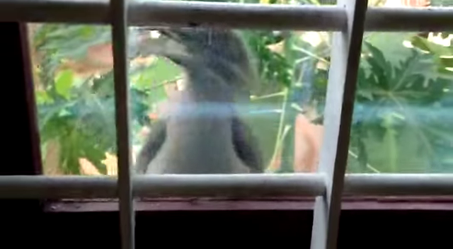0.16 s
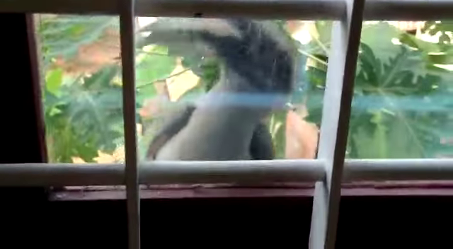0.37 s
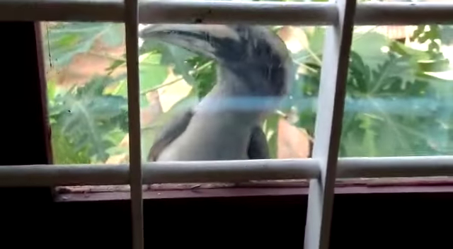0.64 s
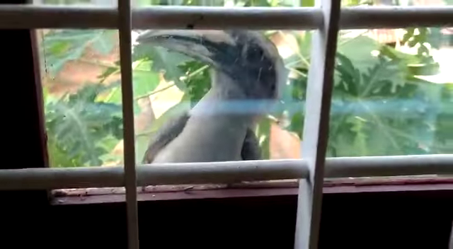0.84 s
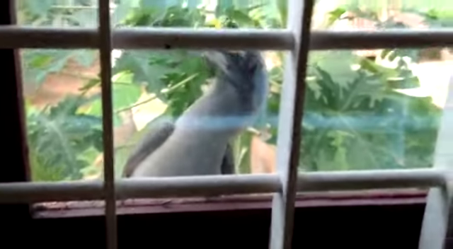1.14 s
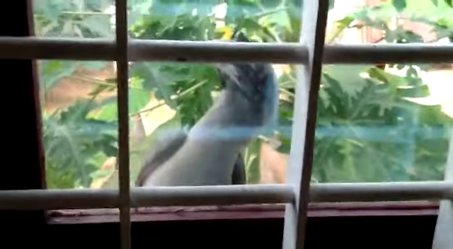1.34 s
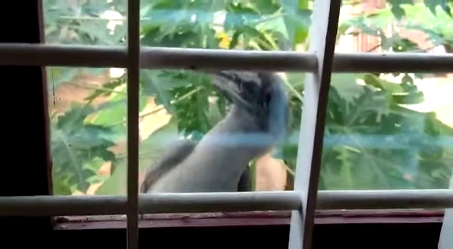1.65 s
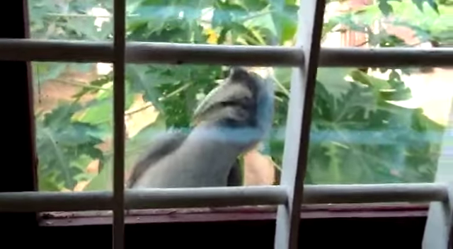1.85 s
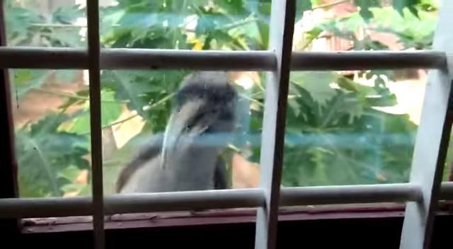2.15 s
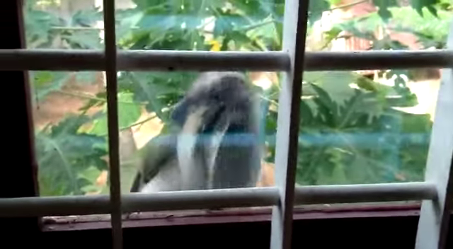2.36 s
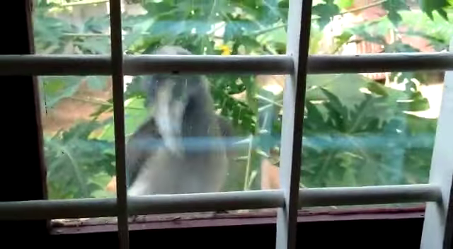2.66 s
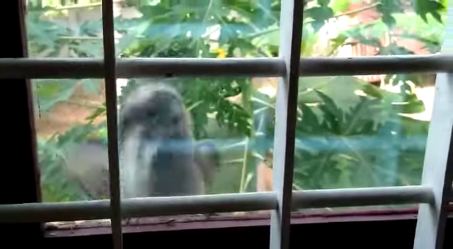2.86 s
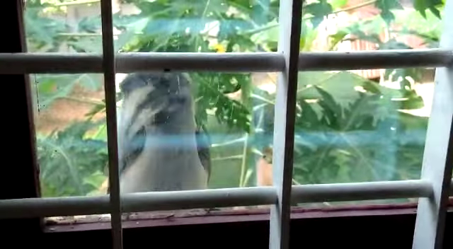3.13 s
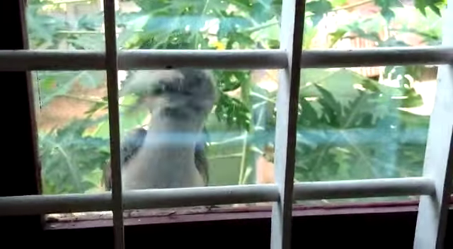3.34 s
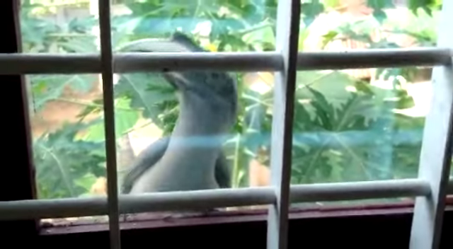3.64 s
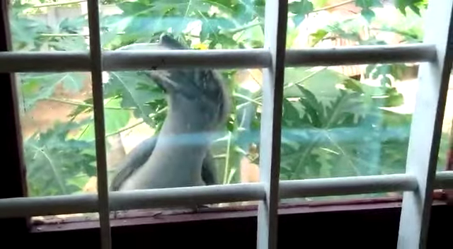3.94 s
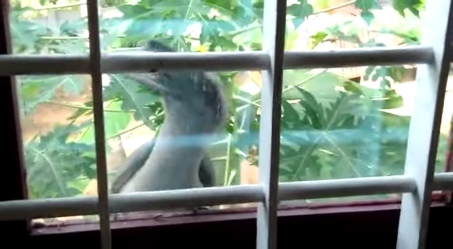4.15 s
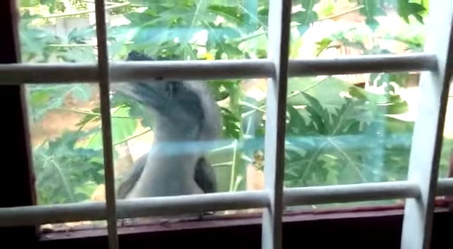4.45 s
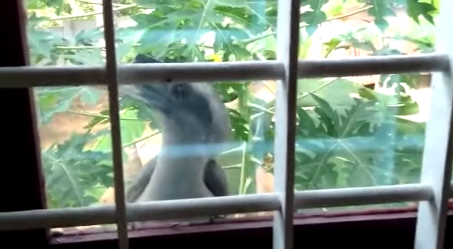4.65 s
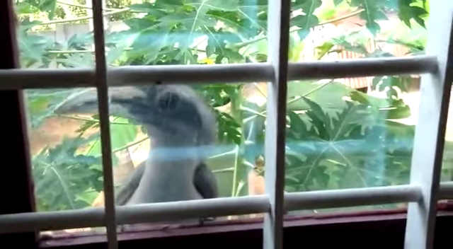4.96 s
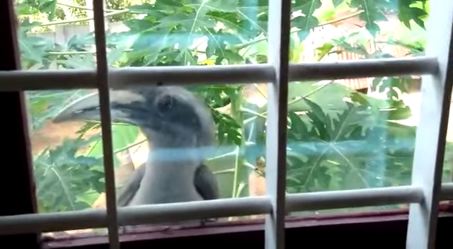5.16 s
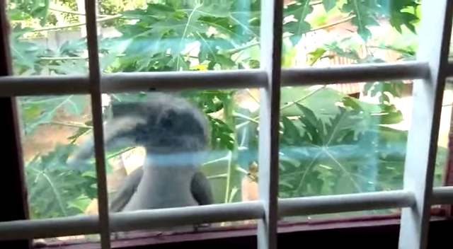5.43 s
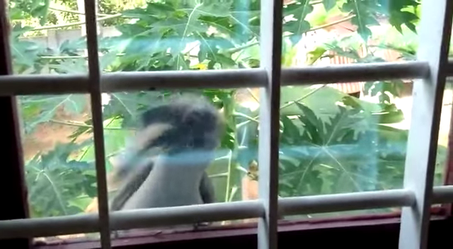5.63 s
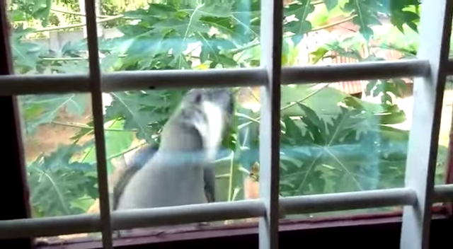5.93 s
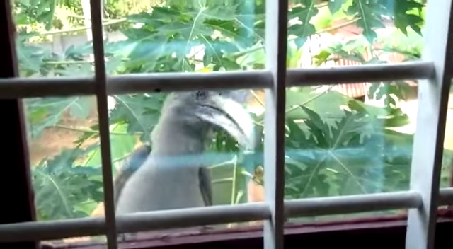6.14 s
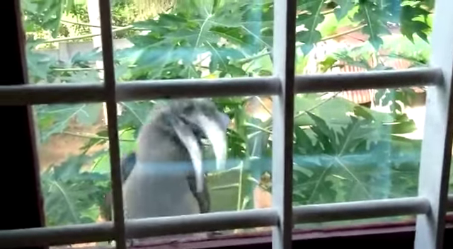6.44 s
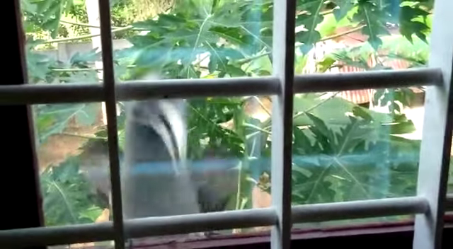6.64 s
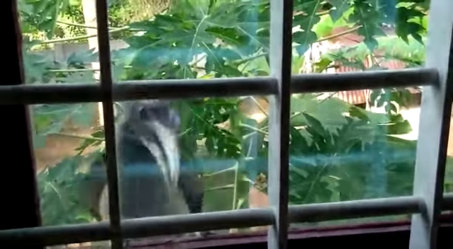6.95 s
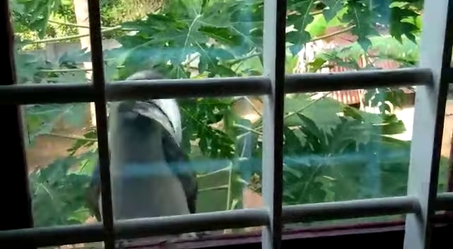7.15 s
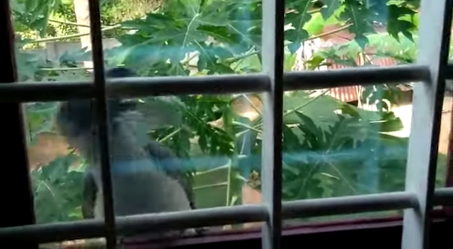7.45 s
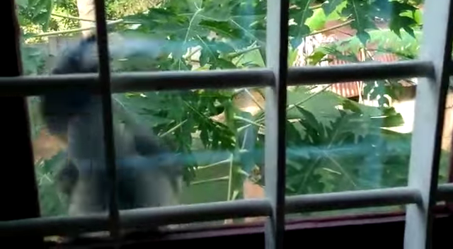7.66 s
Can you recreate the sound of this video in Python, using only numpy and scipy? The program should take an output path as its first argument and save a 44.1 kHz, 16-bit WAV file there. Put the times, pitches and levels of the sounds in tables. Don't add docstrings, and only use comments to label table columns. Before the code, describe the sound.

Irregular thumping, cracking raps of a big bill on framed glass, each with a low ringing and roomy reverberation. A first group fades into quiet town hum and thin cicada rasp; a second group follows, with a rattle and a brief metallic bar strike. Weak taps end it, then a small bird whistles once outside. Close indoor phone pickup.

```python
import sys
import numpy as np
from scipy import signal
from scipy.fft import rfft, irfft
from scipy.io import wavfile
from scipy.ndimage import uniform_filter1d

SR = 44100
rng = np.random.default_rng(int(sys.argv[2]) if len(sys.argv) > 2 else 0)


def master_out(mix):
    frames = np.transpose(np.atleast_2d(mix))
    ceiling = np.clip(frames, -1, 1)
    pcm = np.round(ceiling * 32767).astype(np.int16)
    wavfile.write(sys.argv[1], SR, pcm)


def decibels_to_gain(level_db):
    exponent = np.asarray(level_db, float) / 20
    return 10 ** exponent


N = 343520
TIME = np.arange(N) / SR
KNOCK_LEAD = 1024


# start in seconds,
# strength in dB, then bass, treble and straight thump in dB relative to the strength.
BLOWS = [(0.124, -35, -9, -31, 8), (0.196, -18, -11.5, -21, 10), (0.393, -12, -10.5, -12, 12.5),
         (0.696, -12, -15.5, -15, 12), (1.09, -23, -16, -25, 11), (3.443, -29.5, -12, -24, 11),
         (3.535, -35, -8, -28, 5), (4.403, -11, -12.5, -18, 10), (4.699, -12.5, -10.5, -11, 9),
         (5.095, -13.5, -10, -19, 5.5), (5.864, -44.5, 1, -20, 4), (6.045, -37, -10.5, -33, 5),
         (6.261, -29.5, -3, -30.5, 4.5)]


def blows():
    out = np.zeros((2, N))
    for s, db, bass_db, treble_db, thump_db in BLOWS:
        add(out, thump(db) * decibels_to_gain(db + bass_db + thump_db + 12.7), s + 0.00098)
        add(out, crack(db + treble_db - 5.5, 0.014), s + 0.0014)
    return out


# frequency in Hz, level in dB, T60 in seconds.
THUMP = [(246, -1.5, 0.017), (700, -23, 0.012), (1390, -34, 0.014)]


def thump(db):
    push_s = 0.00062 * decibels_to_gain(-.25 * (db + 13.5))
    push = np.hanning(int(push_s * SR) + 2)
    displaced = np.convolve(ring(THUMP, .06), push / push.sum())
    bend = np.diff(displaced) * SR / (2 * np.pi * THUMP[0][0])
    return ports(np.r_[np.zeros(8), bend], 5, .6)


def crack(db, fade_s):
    t = TIME[:4096]
    return decibels_to_gain(db) * band(rng.standard_normal((2, len(t))), 1500, 10400) * np.exp(-t / fade_s)


# frequency in Hz, level in dB, T60 in seconds.
PANE = [(80.5, -6, 0.96), (111.5, -18, 1.1), (143.2, 1.5, 1.59), (185, -3.5, 2.65), (209.7, -1.5, 1.02),
        (234, -17, 0.6), (277, -6.5, 1.4), (363, -15, 1.1), (417, -13, .9), (461, -11.5, 0.86),
        (639, -11, 0.64)]


def pane_ringing():
    out = np.zeros((2, N))
    modes = np.array([ring([mode], 2.5) for mode in PANE])
    modes = modes * (1 - np.exp(-TIME[:modes.shape[1]] / 0.0022))
    for s, db, *_ in BLOWS:
        chance = rng.standard_normal((2, len(PANE)))
        pane = (decibels_to_gain(2.0 * chance[0]) * np.sign(chance[1])) @ modes
        ring_db = db - 11
        add(out, stilled(pane, s) * decibels_to_gain(ring_db), s)
    return out


# start in seconds, frequency in Hz, level in dB, T60 in seconds.
FAVOURED = [(.124, 575, -38, 0.16), (.124, 640, -39, 0.21), (.197, 618, -32.5, 0.44),
            (.408, 1332, -17.5, 0.06), (.4, 605, -29, .5), (.698, 915, -21, 0.15), (.71, 1370, -21.5, .08),
            (.7, 185, -28, 4.1), (3.444, 3670, -44, 0.023), (3.444, 580, -38, 0.19),
            (3.446, 800, -44, 0.13), (4.356, 1700, -33, 0.006), (5.864, 186, -45, .8),
            (5.1, 184.5, -27.5, 3.6), (5.45, 191.2, -41.5, 4.), (6.046, 864, -48, .08),
            (6.262, 234, -36, 0.9), (6.262, 320, -31, 0.067), (6.262, 700, -39, 0.22)]


def favoured_modes():
    out = np.zeros((2, N))
    onset = 1 - np.exp(-TIME[:int(2.5 * SR)] / .002)
    for s, *mode in FAVOURED:
        add(out, stilled(ring([mode], 2.5) * onset, s), s)
    return out


QUENCHES = [.393, .697, 4.699, 5.095, 6.261, 99]


def stilled(sound, s):
    left = min(q for q in QUENCHES if q > s + .05) - s
    return sound * np.exp(-np.maximum(TIME[:len(sound)] - left, 0) / .02)


# start in seconds, level in dB, fade in seconds.
FURTHER_GRAZES = [
    (1.092, -40, .008),
    (3.445, -50, .008),
    (4.708, -21, 0.011),
    (6.046, -49, 0.0046),
]


def further_grazes():
    out = np.zeros((2, N))
    for s, db, fade_s in FURTHER_GRAZES:
        add(out, crack(db, fade_s), s)
    return out


# start in seconds, strength in dB, dull part in dB.
GRAZES = [
    (4.3549, -59, -6),
    (5.2911, -47.5, -1),
    (5.412, -51, 12),
    (5.475, -49, 10),
    (5.5006, -36.5, -3),
    (5.5287, -23, -13.5),
    (5.5702, -28, -17),
    (6.2639, -43.5, 2),
]


def grazes():
    out = np.zeros((2, N))
    for s, db, _ in GRAZES:
        add(out, crack(db + 0.5, 0.0078), s + 0.00073)
    return out


# frequency in Hz, level in dB, T60 in seconds.
BAR = [(818, -19, .9), (838, -21, .8), (866, 1.5, 0.062), (985, -21, 0.22), (3800, -10, 0.2),
       (3950, -15, .5), (6500, -18, .3)]


def metal_bar():
    out = np.zeros((2, N))
    bar = np.r_[np.zeros(8), ring(BAR, 0.92)]
    add(out, ports(bar, 4, -1.1) * decibels_to_gain(-25.5), 5.528)
    return out


def shaken_room():
    shake = np.zeros((1, N))
    for s, db, bass_db, treble_db, _ in BLOWS:
        deep_db = bass_db + 6 + .4 * (db + 15)
        colour = [(80, deep_db), (200, bass_db + 7), (800, -1), (3000, treble_db + 15.5)]
        add(shake, decibels_to_gain(db) * knock(colour), s)
    for s, db, dull_db in GRAZES:
        colour = [(300, dull_db - 10), (1200, dull_db), (4000, -7.5), (12000, 6)]
        add(shake, decibels_to_gain(db + 11) * knock(colour), s)
    return decibels_to_gain(13) * signal.fftconvolve(shake, room(), axes=1)[:, KNOCK_LEAD:N + KNOCK_LEAD]


def knock(colour):
    hz = np.maximum(np.arange(KNOCK_LEAD + 1) * SR / (2 * KNOCK_LEAD), 1)
    return np.roll(irfft(decibels_to_gain(at(colour, hz))), KNOCK_LEAD)


# frequency in Hz, density in dB per Hz.
SHAKE = [(40, -26), (70, -12), (110, 1), (170, -5.5), (260, -8.5), (400, -18), (650, -17.5), (1000, -20.5),
         (1600, -22.5), (2500, -25), (4000, -29), (6500, -37), (10500, -49.5), (15000, -55.5)]
# frequency in Hz, T60 in seconds.
ROOM_T60 = [(60, 0.79), (160, 1.13), (420, 1.31), (1100, 0.72), (2910, 0.77), (7680, 0.56)]


def room():
    t = TIME[:int(1.6 * SR)]
    build = np.clip((t - .002) / 0.01, 0, 1) ** 2
    early = 1 + 2.52 * np.exp(-t / 0.01)

    def decay(hz):
        return build * early * decibels_to_gain(-60 * t / at(ROOM_T60, hz))
    return diffuse(SHAKE, len(t), decay, 0.97)


def chirp():
    start_s, length_s = 6.771, .094
    age = np.clip(TIME - start_s, 0, length_s)
    hz = 3335 - 2700 * age - 150 * (age / length_s) ** 4
    phase = 2 * np.pi * np.cumsum(hz) / SR
    on = np.clip(age / .014, 0, 1) * np.clip((length_s - age) / .012, 0, 1)
    cracked = np.exp(-((TIME - 6.818) / .013) ** 2)
    voice = (1 - .65 * cracked) * np.sin(phase) + decibels_to_gain(-19) * cracked * np.sin(2 * phase)
    call = on * decibels_to_gain(-29.5 - 100 * age) * voice
    t = TIME[:SR]
    yard = rng.standard_normal((2, SR)) * decibels_to_gain(-60 * t / 0.51) * (t > .025)
    return ports(call, 6, 0.1) + decibels_to_gain(-37.5) * signal.fftconvolve(call[None], yard, axes=1)[:, :N]


def cicada():
    phase = np.cumsum(238 * (1 + 0.03 * walk(60))) / SR
    clicks = np.diff(np.floor(phase), prepend=0)
    clicks = clicks * decibels_to_gain(3 * rng.standard_normal(N)) * np.sign(rng.standard_normal(N))
    t = TIME[:256]
    belly = np.sin(2 * np.pi * 9000 * t) * np.exp(-((t - .0025) / .0009) ** 2)
    rasp = band(rng.standard_normal(N), 8800, 10000)
    song = unit(np.convolve(clicks, belly)[:N]) + 0.96 * unit(rasp)
    return ports(song * phrasing() * decibels_to_gain(-7.5), -1, -3.0)


# start in seconds, length in seconds, level in dB.
PHRASES = [(.09, .24, -61), (1.34, .33, -64), (1.77, .15, -67), (1.97, .05, -64), (2.08, .16, -62),
           (2.17, .07, -59), (2.25, .17, -64), (2.47, .15, -61.5), (2.64, .12, -63), (2.72, .18, -62),
           (2.94, .19, -64), (3.15, .21, -61), (3.42, .1, -62), (3.6, .31, -58), (3.92, .15, -61),
           (3.99, .07, -60), (4.08, .18, -63), (4.28, .24, -61), (5.27, .16, -68), (5.7, .2, -64),
           (6.0, .065, -61), (6.18, .25, -62.5), (6.5, .31, -63.5), (6.81, .06, -61), (6.95, .15, -62.5),
           (7.26, .24, -63), (7.5, .17, -66), (7.68, .16, -61.5)]


def phrasing():
    syllable_s, break_s, break_db, chorus_db = .082, .016, -9, -70
    power = np.full((1, N), decibels_to_gain(chorus_db) ** 2)
    for s, length_s, db in PHRASES:
        resting = TIME[:int(length_s * SR)] % syllable_s > syllable_s - break_s
        add(power, decibels_to_gain(db + break_db * resting) ** 2, s)
    return np.sqrt(uniform_filter1d(power[0], size=300)) * decibels_to_gain(1.5 * walk(14))


# start in seconds, length in seconds, first and last frequency in Hz, level in dB.
SPELLS = [
    (1.9, .8, 385, 320, -51.5),
    (3.95, .45, 290, 300, -58),
    (6.35, .65, 535, 630, -54.5),
    (7.17, .22, 745, 790, -56),
    (7.4, .3, 795, 830, -62),
]


def motor():
    waver, flutter = 1 + .04 * walk(60), decibels_to_gain(4 * walk(25))
    out = 0
    for s, length_s, first_hz, last_hz, db in SPELLS:
        part = np.clip((TIME - s) / length_s, 0, 1)
        hz = first_hz + (last_hz - first_hz) * part
        phase = 2 * np.pi * np.cumsum(hz * waver) / SR
        out = out + decibels_to_gain(db - 2) * np.sin(np.pi * part) ** 2 * np.sin(phase)
    return out * flutter


# frequency in Hz, density in dB per Hz.
HUM = [(40, -3.5), (70, -1), (110, 8), (170, 0.53), (260, 0), (400, -6), (650, -16.5), (1000, -20),
       (1600, -25), (2500, -26.5), (4000, -31.5), (6500, -35.5), (10500, -35.5), (15000, -36)]
# centre in seconds, half width in seconds, change in dB.
TRAFFIC = [
    (2.95, .35, 2.5),
    (4.2, .6, -1.5),
    (6.4, .8, 2.5),
]


def hum():
    swell = walk(1.2)
    level_db = -51.8 + sum(db * np.exp(-((TIME - s) / width_s) ** 2) for s, width_s, db in TRAFFIC)
    noise = diffuse(HUM, N, lambda hz: decibels_to_gain(swell + 1.76 * walk(9)), 0.71)
    return decibels_to_gain(level_db + 4) * unit(noise)


# frequency in Hz, share from 0 to 1.
ALIKE = [(60, 0.95), (250, 0.98), (700, 0.6), (1300, 0.02), (2000, 0.01), (15000, 0)]


def diffuse(colour, size, shape, alike):
    out = 0
    for hz in 40 * 2 ** (np.arange(27) / 3):
        noise = rng.standard_normal((2, size))
        mid, side = band(noise, hz / 2 ** (1 / 6), hz * 2 ** (1 / 6))
        c = np.clip(alike * at(ALIKE, hz), 0, 1)
        pair = np.sqrt(1 + c) * mid + np.sqrt(1 - c) * side * np.array([[1], [-1]])
        out = out + decibels_to_gain(at(colour, hz)) * shape(hz) * pair
    return out


def ring(modes, seconds):
    hz, db, t60 = np.transpose(modes)[:, :, None]
    t = TIME[:int(seconds * SR)]
    decay = decibels_to_gain(-60 * t / np.maximum(t60, 1e-3))
    return (decibels_to_gain(db) * np.sin(2 * np.pi * hz * t) * decay).sum(axis=0)


def ports(mono, lead, pan_db):
    return np.array([np.roll(mono, -lead) * decibels_to_gain(pan_db / 2), mono * decibels_to_gain(-pan_db / 2)])


def walk(rate_hz):
    k = int(SR / rate_hz)
    held = np.repeat(rng.standard_normal(N // k + 1), k)
    return uniform_filter1d(uniform_filter1d(held, k), k)[:N]


def at(table, hz):
    f, v = np.transpose(table)
    return np.interp(np.log(hz), np.log(f), v)


def band(x, lo_hz, hi_hz):
    sos = signal.butter(N=2, Wn=[lo_hz, min(hi_hz, .45 * SR)], btype="band", fs=SR, output="sos")
    return signal.sosfilt(sos, x)


def unit(x):
    return x / np.sqrt(np.mean(x ** 2))


def add(out, sound, s):
    i = int(s * SR)
    out[:, i:i + sound.shape[-1]] += sound[..., :N - i]


def scene():
    window = blows() + pane_ringing() + favoured_modes() + further_grazes() + grazes() + metal_bar() + shaken_room()
    return window + chirp() + cicada() + motor() + hum()


def top_cut(x):
    return signal.sosfilt(signal.butter(12, 16360, fs=SR, output="sos"), x)


# frequency in Hz, level in dB.
RIGHT_PORT = [(60, -1), (150, .8), (500, 5), (1500, 7), (5000, 6), (9000, 10.5), (15000, 5)]
# frequency in Hz, share from 0 to 1.
CROSS = [(60, .92), (2500, .96), (5000, .96), (7500, .6), (10000, .4), (15000, .15)]


def record(dry):
    hz = np.maximum(np.arange(N // 2 + 1) * SR / N, 1)
    pair = rfft(dry) * decibels_to_gain(at(RIGHT_PORT, hz) * np.array([[-.5], [.5]]))
    lag_s = 18.1 / SR
    late = pair[::-1] * np.clip(at(CROSS, hz), 0, 1) * np.exp(-2j * np.pi * hz * lag_s)
    loud_db = 10 * np.log10(uniform_filter1d(np.mean(dry ** 2, axis=0), 1024) + 1e-12)
    depth = 1 - .3 * np.clip((loud_db + 48) / 12, 0, 1)
    wide = irfft(pair, N) - depth * irfft(late, N)
    wide = signal.sosfilt(signal.butter(N=3, Wn=64, btype="high", fs=SR, output="sos"), wide)
    wide = signal.sosfilt(signal.butter(N=20, Wn=15800, fs=SR, output="sos"), wide)
    mix = np.clip(wide, -.97, .97)
    return top_cut(mix)


dry = scene()
out = record(dry)
master_out(out)
```